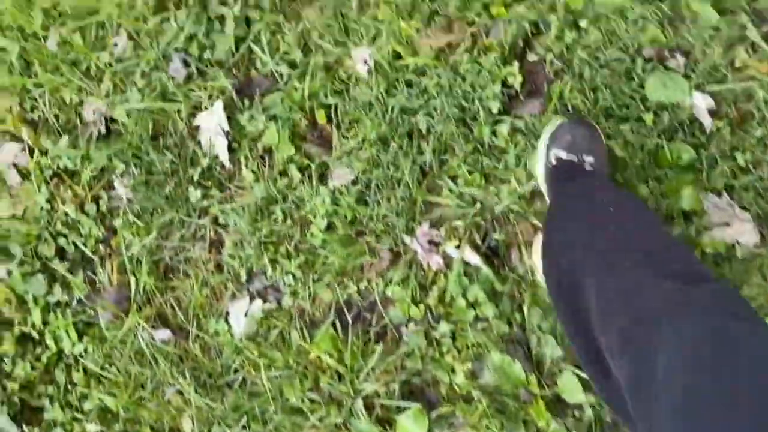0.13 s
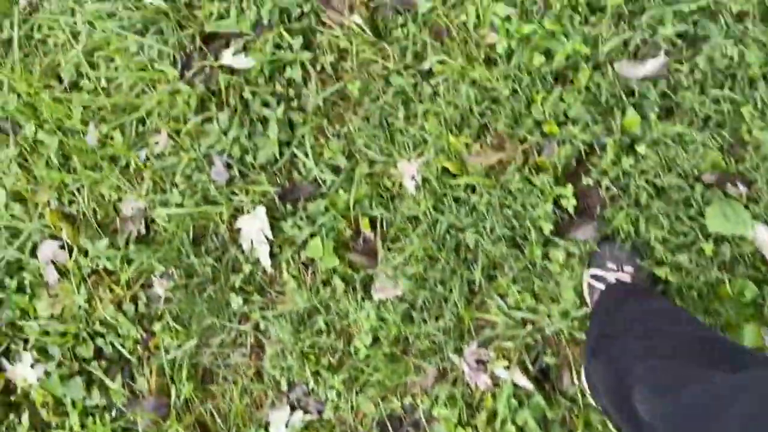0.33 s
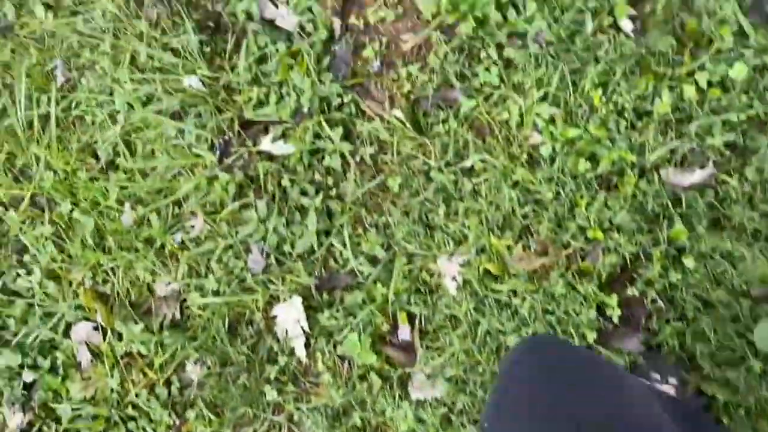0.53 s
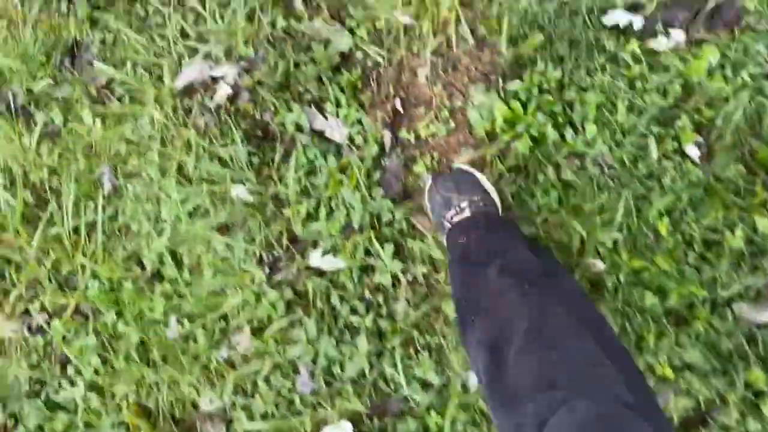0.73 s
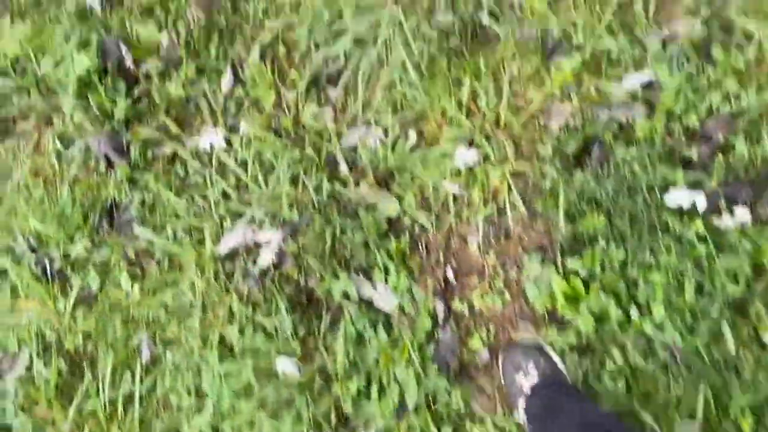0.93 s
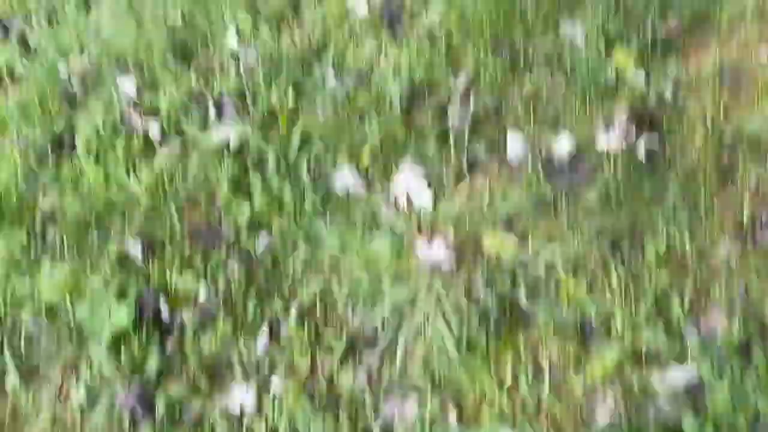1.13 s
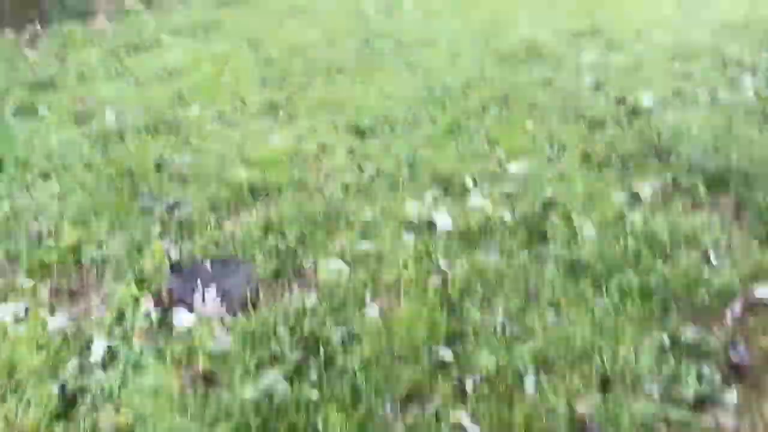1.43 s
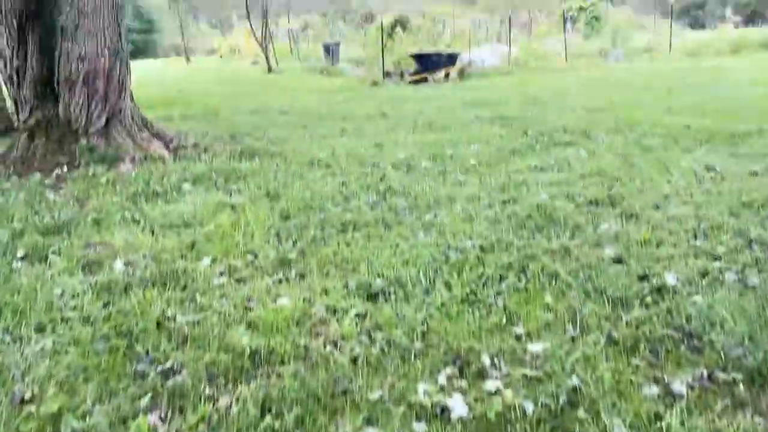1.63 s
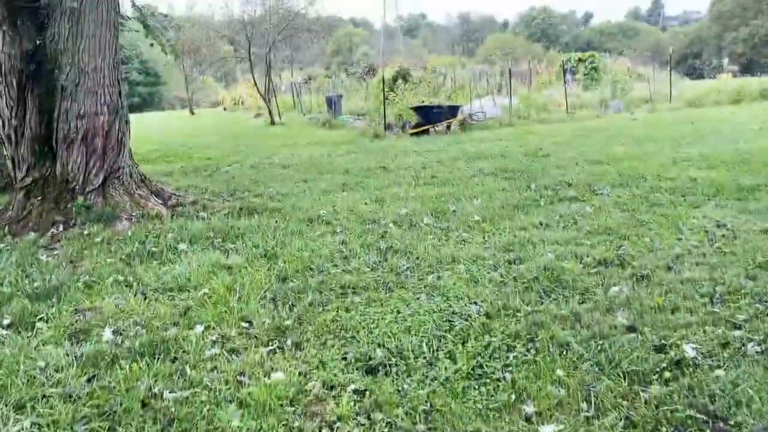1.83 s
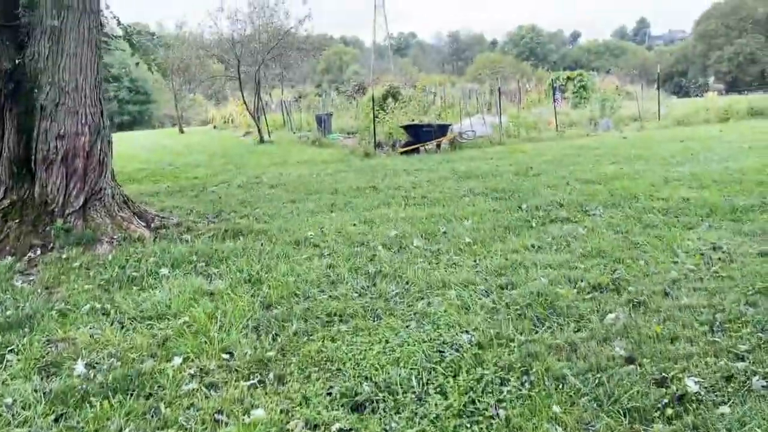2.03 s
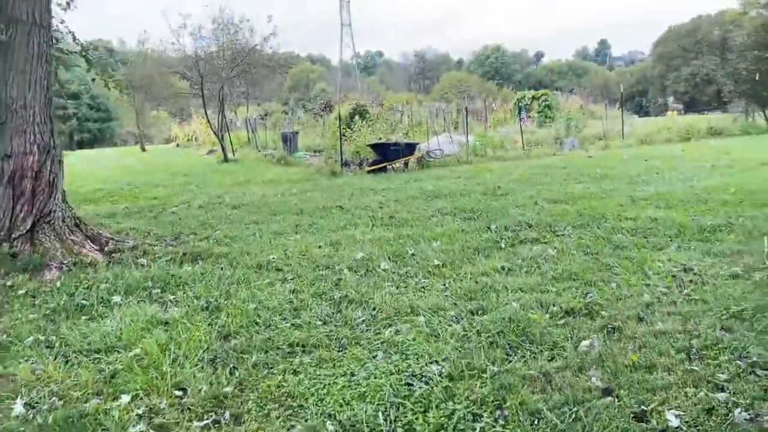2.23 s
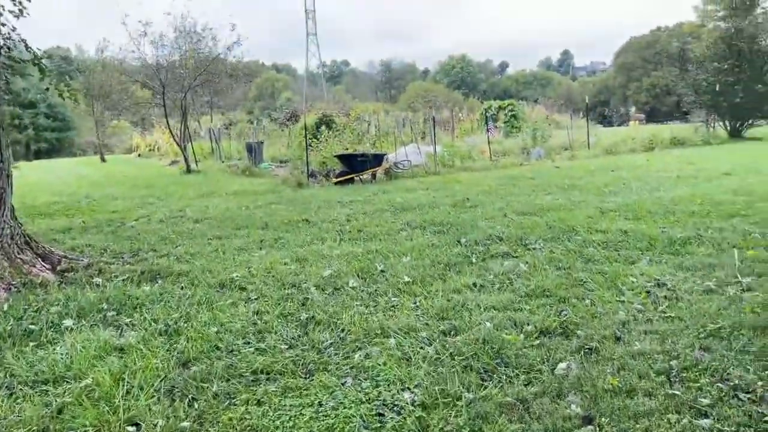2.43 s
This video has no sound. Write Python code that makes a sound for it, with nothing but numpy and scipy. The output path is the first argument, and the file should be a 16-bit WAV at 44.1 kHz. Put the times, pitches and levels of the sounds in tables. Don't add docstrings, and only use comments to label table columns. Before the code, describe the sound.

Footsteps in grass: from 0 to about 1.4 seconds shoes swish and crunch, with crisp leaf snaps near 0.25 and dull low handling thumps and breeze rumble. Far insects hiss throughout under a fast, high cricket ticking. After 1.5 the walker slows; a steady cricket trill swells toward 1.85. From 1.9 a nearer cricket chirps left, amid last scuffs, a creak at 2.2 and a loud snap at 2.32.

```python
import sys
import numpy as np
from scipy import signal
from scipy.fft import rfft, irfft
from scipy.io import wavfile

SR = 44100
rng = np.random.default_rng(int(sys.argv[2]) if len(sys.argv) > 2 else 0)


def master_out(mix):
    frames = np.transpose(np.atleast_2d(mix))
    ceiling = np.clip(frames, -1, 1)
    pcm = np.round(ceiling * 32767).astype(np.int16)
    wavfile.write(sys.argv[1], SR, pcm)


def elevation(decibels):
    levels = np.asarray(decibels, float)
    return 10 ** (levels / 20)


N = 114660
SIDES = np.array([[1], [-1]])
LOW_APART, HIGH_APART = 0.3, 0.06


def rms_one(x):
    return x / np.sqrt(np.mean(x ** 2) + 1e-20)


def curve(rows, at=None):
    return np.interp(np.arange(N) / SR if at is None else at, *np.transpose(rows))


def colour(x, points):
    hz, db = np.transpose(points)
    log_hz = np.log(np.arange(N // 2 + 1) * SR / N + 1)
    knots = np.r_[np.log(hz[0] / 2), np.log(hz), np.log(hz[-1] * 1.25)]
    gain_db = np.interp(log_hz, knots, np.r_[db[0] - 30, db, db[-1] - 30])
    return rms_one(irfft(rfft(x) * elevation(gain_db), N))


def drift(rate_hz):
    r = np.exp(-2 * np.pi * rate_hz / SR)
    wander = signal.lfilter([1], [1, -2 * r, r * r], rng.standard_normal(N + SR))
    return rms_one(wander[SR:])


def resonate(x, hz, width_hz):
    r = np.exp(-np.pi * width_hz / SR)
    poles = [1, -2 * r * np.cos(2 * np.pi * hz / SR), r * r]
    return signal.lfilter([(1 - r * r) / 2, 0, (r * r - 1) / 2], poles, x + 1e-18)


def resonate_twice(x, hz, width_hz):
    return resonate(resonate(x, hz, width_hz), hz, width_hz)


def butter(x, order, hz, kind):
    return signal.sosfilt(signal.butter(order, hz, kind, fs=SR, output="sos"), x)


def gate(start, length):
    rise_s, fall_s = 0.0059, 0.022
    t = np.arange(N) / SR - start
    rise = np.sin(np.pi / 2 * np.clip(t / rise_s, 0, 1)) ** 2
    return rise * np.exp(-np.clip(t - length, 0, 1) / fall_s)


def pan(x, db):
    return x * elevation(SIDES * db / 2)


def pair(apart):
    mid, side = rng.standard_normal((2, N))
    return mid + apart * side * SIDES


def blips(s, db, hz, sweep_hz, pulse_s, phase):
    out = np.zeros(N + SR)
    for start, level, pitch, sweep, width, turn in np.broadcast(s, db, hz, sweep_hz, pulse_s, phase):
        half = int(3 * width * SR)
        t = np.arange(-half, half) / SR
        at = int(start * SR) + SR // 2 - len(t) // 2
        cycles = pitch * t - sweep * t * t / (4 * width)
        out[at:at + len(t)] += elevation(level) * np.exp(-(t / width) ** 2) * np.sin(turn + 2 * np.pi * cycles)
    return out[SR // 2:SR // 2 + N]


def wing_strokes(levels, first_s, gap_s, hz, sweep_hz, pulse_s, pan_db):
    s = np.arange(first_s % gap_s, N / SR, gap_s)
    late, louder, phase = rng.standard_normal((3, len(s)))
    strokes = blips(s + 0.00044 * late, curve(levels, s) + 0.5 * louder, hz, sweep_hz, pulse_s, 9 * phase)
    return pan(strokes, pan_db)


# f/Hz, level/dB per Hz
AIR_SPECTRUM = [(150, -4), (300, -11.5), (600, -13), (1500, -12.5), (3000, -16.5), (4600, -16)]
# t/s, level/dB
STIR = [
    (0, 0.5),
    (1.45, -1.5),
    (1.52, -4),
    (1.6, -6),
    (1.75, -7),
    (1.85, -2),
    (2.1, 3),
    (2.33, 0.5),
    (2.42, -3),
    (2.6, 1.5),
]


def air():
    level_db = -66 + curve(STIR) + 1.0 * drift(3.7)
    return elevation(level_db) * colour(pair(0.73), AIR_SPECTRUM)


# t/s, level/dB
GUSTS = [(0, -73), (.07, -71), (.22, -52.5), (.31, -67), (.4, -49.5), (.49, -58), (.6, -49), (1.3, -50),
         (1.42, -56.5), (1.8, -46.5), (2.12, -55), (2.6, -59)]


def breeze():
    rumble = butter(pair(0.28), 2, [45, 95], "band")
    lumps = elevation(1.5 * drift(16.4))
    return rms_one(rumble * lumps) * elevation(curve(GUSTS))


# f/Hz, width/Hz, level/dB, left-right/dB
CHORUS = [
    (5415, 1140, -70, 14.5),
    (6100, 2400, -68, 0.5),
    (7350, 1850, -64, 7),
    (8890, 1180, -65.5, -1.5),
    (10350, 820, -62, 0),
]


def chorus():
    out = 0
    for hz, width_hz, db, pan_db in CHORUS:
        apart = LOW_APART if hz < 8000 else HIGH_APART
        band = rms_one(resonate_twice(pair(apart), hz, width_hz))
        throb_db = 1.5 * drift(41)
        out = out + pan(band, pan_db) * elevation(db + throb_db)
    return butter(out, 4, 4400, "high")


# t/s, peak/dB
TICKER = [
    (0, -61),
    (1.3, -61),
    (1.45, -57),
    (2.3, -57),
    (2.6, -60),
]


def ticker():
    return wing_strokes(TICKER, first_s=.032, gap_s=.03704, hz=6673, sweep_hz=115, pulse_s=0.0071, pan_db=1.5)


# t/s, peak/dB
TRILL = [
    (0, -67),
    (.8, -64),
    (1.4, -60),
    (1.85, -57),
    (2.0, -63),
    (2.6, -66),
]


def trill():
    return wing_strokes(TRILL, first_s=1.5149, gap_s=.01597, hz=5120, sweep_hz=610, pulse_s=0.0049, pan_db=4)


# first pulse t/s, pulses, peak/dB
CHIRPS = [
    (1.911, 4.6, -53),
    (1.98, 4.2, -52.5),
    (2.06, 4.9, -50.5),
    (2.1263, 4.5, -51),
    (2.193, 5.5, -49.5),
    (2.273, 4.5, -47.5),
    (2.3393, 5.5, -49.5),
    (2.419, 5.6, -48.5),
    (2.498, 4.05, -46.5),
    (2.565, 3.4, -48.5),
]


def chirps():
    pulses = []
    for s, count, db in CHIRPS:
        last = int(count)
        for k in range(last + 1):
            start_db = -6 / (k + 1) ** 2
            end_db = -10 * (k == last)
            pulses.append((s + k * 0.0128, db + start_db + end_db + rng.normal(0, 1)))
    s, db = np.transpose(pulses)
    strokes = blips(s, db, hz=5090, sweep_hz=740, pulse_s=0.003, phase=rng.uniform(0, 9.1, len(s)))
    return pan(strokes, 8)


# t/s, peak/dB, f/Hz
JOLTS = [(0.116, -43.5, 114), (0.367, -38, 121), (0.394, -39, 101), (0.408, -37, 115), (0.537, -34.0, 107),
         (0.552, -46, 88), (0.579, -47, 109), (0.599, -46.0, 72), (0.612, -49, 115), (0.676, -46.5, 77),
         (0.699, -29, 91.6), (0.709, -44.0, 59.7), (0.731, -37.5, 83), (0.765, -38.5, 48),
         (0.772, -42.5, 89), (0.799, -38.0, 70.6), (0.857, -42.5, 114), (0.873, -33, 45),
         (0.876, -35, 71.5), (0.891, -29.5, 109), (0.905, -30, 51.6), (0.921, -45, 115), (0.932, -31, 57.6),
         (0.941, -45, 101), (0.962, -33, 63.5), (0.996, -37.5, 83), (1.134, -48.5, 82), (1.17, -31.5, 60.5),
         (1.195, -32.5, 95), (1.218, -32, 54), (1.234, -44, 87.4), (1.254, -55, 94), (1.27, -34, 56.3),
         (1.322, -44.5, 71), (1.476, -38, 58), (1.56, -45.0, 78), (1.591, -44, 87), (1.618, -39, 63),
         (1.689, -35, 59), (1.702, -42.0, 95), (1.724, -37.5, 83), (1.744, -42, 96), (1.765, -32.5, 98),
         (1.785, -38.0, 83), (1.806, -43, 45), (1.811, -43.0, 110), (1.832, -32, 58), (1.836, -41, 109),
         (1.9, -31.5, 72), (1.905, -41, 115), (1.93, -37, 83), (1.946, -34.0, 97), (1.965, -42, 101),
         (2.013, -42.5, 82), (2.045, -36.5, 115), (2.065, -27, 74), (2.157, -40.0, 67), (2.328, -40, 85)]
# t/s, peak/dB, f/Hz
KNOCKS = [(0.204, -36.5, 138), (0.218, -44, 164), (0.228, -42, 129), (0.248, -40.5, 165), (0.259, -45, 134),
          (0.35, -44, 152), (0.51, -45.5, 142), (0.695, -54, 187), (0.705, -45.5, 146), (0.886, -46.5, 176),
          (0.897, -40.5, 176), (0.906, -47, 140), (1.675, -43, 214), (1.675, -35.5, 133),
          (1.769, -47.5, 161), (1.848, -39, 133), (1.863, -45, 153), (1.891, -44.0, 130)]


def jolts():
    s, db, hz = np.transpose(list(JOLTS) + list(KNOCKS))
    phase, uneven = rng.standard_normal((2, len(s)))
    skew_rad = 0.33 + 0.19 * uneven
    swing_s = 0.79 / hz
    return np.array([blips(s, db, hz, .45 * hz, swing_s, 9 * phase + side * skew_rad) for side in (1, -1)])


# t/s, length/s, level/dB, f/Hz, width/Hz
CREAK = [
    (-.01, .02, -61, 3800, 1200),
    (1.272, .05, -61, 450, 450),
    (1.485, .09, -74, 520, 90),
    (2.037, .028, -61, 2600, 700),
    (2.204, .038, -55.5, 1020, 200),
    (2.21, .04, -70, 450, 120),
]


def creak():
    out = np.zeros(N)
    for s, length, db, hz, width_hz in CREAK:
        rub = rms_one(resonate_twice(rng.standard_normal(N), hz, width_hz))
        out += elevation(db) * gate(s, length) * rub
    return out


# t/s, peak/dB, ring f/Hz, crack over ring/dB
SNAPS = [(.024, -46, 900, -4), (.052, -49, 800, -4), (.2236, -33, 9000, -1), (.2286, -35, 8900, -1),
         (.2635, -28, 9300, 2), (.2642, -37, 1500, -8), (.2756, -34, 9000, 1), (.316, -49, 2300, 0),
         (.3272, -45, 3500, 3), (.434, -43, 3600, 0), (.464, -42, 3500, 0), (.48, -43, 1040, 4),
         (.493, -43, 2800, 0), (.5425, -47, 4200, -3), (.5676, -43, 2200, 2), (.757, -38, 1700, -5),
         (.7646, -38, 1500, -1), (.8715, -44, 1400, -6), (.884, -45, 1800, -6), (.8925, -43, 1200, -6),
         (.9605, -46, 1500, -6), (.991, -49, 1200, -4), (1.3234, -46, 1500, -3), (1.879, -47, 1500, -3),
         (1.8852, -42, 1300, -9), (1.9376, -44, 1200, -2), (1.958, -48, 800, -6), (1.9856, -34, 7400, -1),
         (2.112, -42, 1700, -7), (2.1155, -42, 1000, -7), (2.2081, -34, 3000, 1), (2.3212, -44, 3300, 4),
         (2.3243, -24, 5050, 1), (2.3284, -35, 8500, 3)]
# f/Hz, width/Hz, level/dB
CRACK = [(1200, 1400, 4), (3500, 3000, -7), (7000, 3500, -3), (11700, 2000, 9), (15400, 2000, 13)]


def snaps():
    out = np.zeros(N)
    k = np.arange(600)
    for s, db, hz, crack_db in SNAPS:
        puff = rng.standard_normal(600) * k * np.exp(-k / 14.)
        ring = resonate(puff, hz, hz / 3.5)
        crack = sum(elevation(part_db) * resonate(puff, part_hz, width_hz) for part_hz, width_hz, part_db in CRACK)
        both = ring / abs(ring).max() + elevation(crack_db) * crack / abs(crack).max()
        at = int(s * SR)
        out[at:at + 600] += elevation(db + 1) * both / abs(both).max()
    return out


# t/s, length/s, level/dB, hiss over crunch/dB
SWISHES = [(-.03, 0.08, -61.5, 6), (0.074, 0.17, -67.5, 7.5), (0.171, 0.072, -60, 4.5),
           (0.219, 0.011, -64, 14), (0.259, 0.018, -59, 11.5), (.405, 0.078, -56, 1.5),
           (0.457, 0.044, -56, -24), (0.523, 0.14, -61.5, -6.5), (0.657, 0.071, -55.5, 6),
           (0.721, 0.039, -56, 7.5), (0.848, 0.049, -55, -9), (0.93, 0.043, -59.5, -6),
           (1.104, 0.21, -63.5, -8), (1.303, 0.063, -58.5, 0.5), (1.339, 0.12, -59.5, 0),
           (1.57, 0.09, -63, -2), (1.87, 0.026, -58.5, -5.5), (1.925, 0.036, -60, -22),
           (2.028, 0.037, -58.5, -1.5), (2.096, 0.022, -53.5, -5), (2.142, 0.03, -69, 8),
           (2.201, 0.059, -58, 0.5)]
# f/Hz, level/dB per Hz
CRUNCH = [(250, -5.5), (500, -3.5), (1400, -2), (3000, -8.5), (5000, -8.5), (7500, -26), (12000, -8.5)]
# f/Hz, level/dB per Hz
HISS = [(4000, -25), (7000, -22.5), (9000, -9), (10300, -3.5), (12000, -21), (16000, -10)]


def grains():
    sizes_db = 3.0 * np.minimum(rng.exponential(1, N), 5) + 2.5 * drift(80)
    hits = rng.random(N) < 9000 / SR
    return rms_one(elevation(sizes_db) * rng.choice([-1, 1], N) * hits)


def grass():
    out = 0
    for spectrum, side, share, apart in ((CRUNCH, "low", 0, LOW_APART),
                                         (CRUNCH, "high", 0.71, LOW_APART),
                                         (HISS, "high", 1, HIGH_APART)):
        body = colour(grains() + apart * rng.standard_normal(N) * SIDES, spectrum)
        body = butter(body, 2, 1340, side)
        power = sum((elevation(db + share * hiss_db) * gate(s, length)) ** 2 for s, length, db, hiss_db in SWISHES)
        out = out + body * np.sqrt(power)
    return out


# f/Hz, left lead/rad
PORTS = [(0, 0), (1000, -.5), (3400, .4), (5700, .9), (6700, 0), (7800, 1.1), (10300, -3.14), (11700, -6.2),
         (12900, -6.5), (13300, -9.3), (14400, -9.6), (15000, -12.4), (16500, -12.9)]
# f/Hz, level/dB
TOP = [(11500, 0), (12300, -7), (13000, -20), (14400, -22), (15000, -17), (16200, -32)]


def microphones(field):
    hz = np.arange(N // 2 + 1) * SR / N
    lead = curve(PORTS, hz) / 2
    return irfft(rfft(field) * elevation(curve(TOP, hz)) * np.exp(1j * lead * SIDES), N)


def scene():
    insects = chorus() + ticker() + trill() + chirps()
    walker = creak() + snaps() + grass()
    return microphones(air() + insects + walker) + breeze() + jolts()


def band_limit(x):
    return signal.sosfilt(signal.butter(12, 16850, fs=SR, output="sos"), x)


def record(dry):
    mix = butter(dry, 2, 36, "high")
    return band_limit(mix)


dry = scene()
out = record(dry)
master_out(out)
```